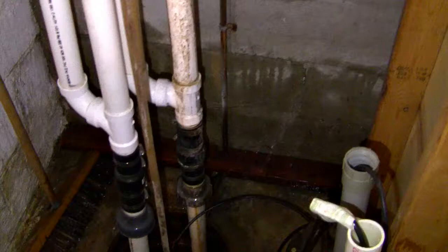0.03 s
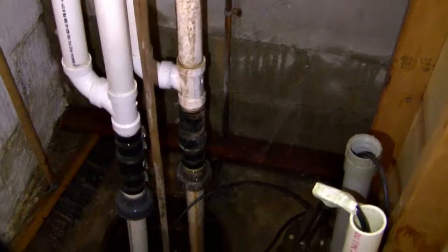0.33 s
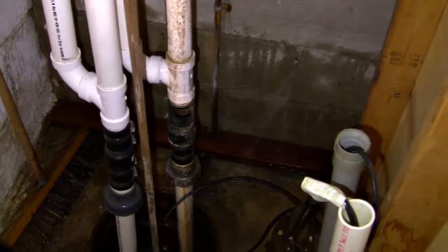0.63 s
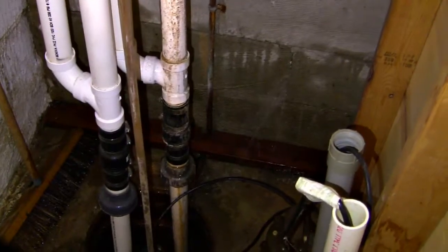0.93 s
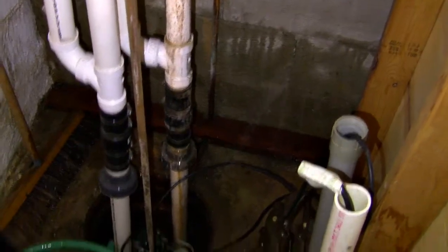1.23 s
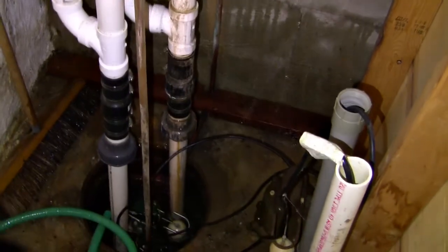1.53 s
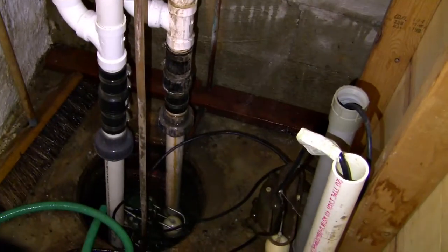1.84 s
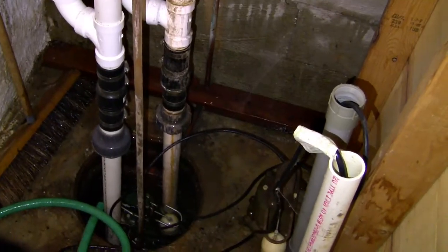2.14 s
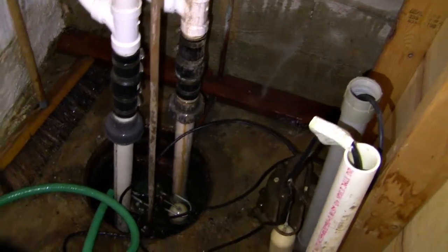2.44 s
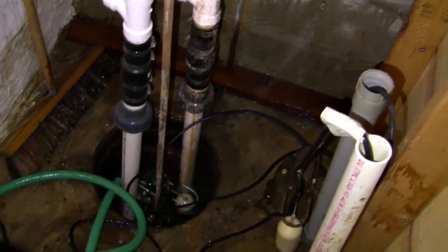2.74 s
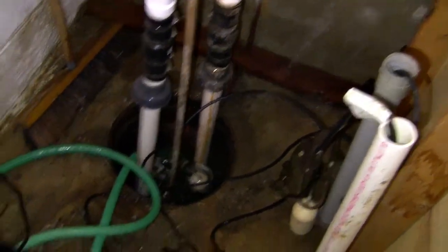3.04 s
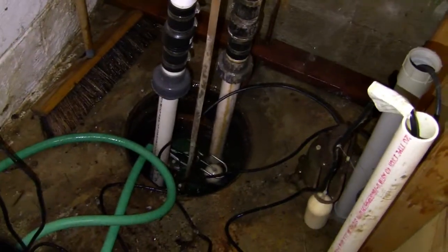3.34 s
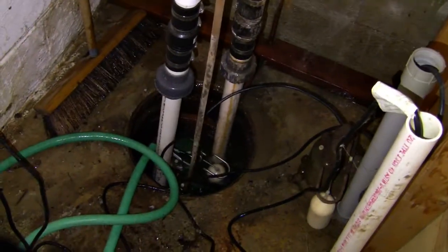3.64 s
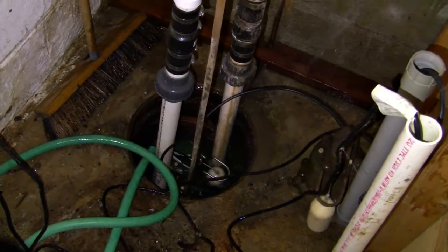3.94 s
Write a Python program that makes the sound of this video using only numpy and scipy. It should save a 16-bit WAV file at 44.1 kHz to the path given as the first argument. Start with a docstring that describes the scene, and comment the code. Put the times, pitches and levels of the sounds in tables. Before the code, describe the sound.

Water trickles and drips into a basement sump pit over a low pump hum.

```python
"""Trickle in a basement sump pit

Drops smack the water, ring small bubbles and echo in the pit and the room. Fine spatter, hiss and low
gurgling fill the gaps, over the hum and rush of a pump and a thin motor whine that fades.
Near the start a hand-held camera gives a few dull clicks."""
import sys
import numpy as np
from scipy import signal
from scipy.fft import rfft, irfft, next_fast_len
from scipy.io import wavfile
from scipy.ndimage import uniform_filter1d, map_coordinates

SR = 44100
rng = np.random.default_rng(int(sys.argv[2]) if len(sys.argv) > 2 else 0)


def output_pcm(signal):
    """Save a mono or channel-first signal as 16-bit PCM at the path in sys.argv[1].

    Samples are clipped to [-1, 1] before scaling.
    """
    pcm = np.clip(np.atleast_2d(signal).T, -1, 1) * 32767
    wavfile.write(sys.argv[1], SR, np.round(pcm).astype(np.int16))


N = 176400
T = np.arange(N) / SR
AGE = np.arange(SR // 4) / SR  # seconds since a drop or click struck


def amp(db):
    """Decibels to gain."""
    return 10 ** (np.asarray(db) / 20)


def unit(x):
    """Scale to rms 1."""
    return x / np.sqrt(np.mean(x ** 2) + 1e-20)


def fade(t60):
    """An exponential decay, 60 dB down after t60 seconds."""
    return np.exp(-np.log(1000) * AGE / t60)


def wobble(rate):
    """A smooth random curve, rate knots a second."""
    return map_coordinates(rng.standard_normal(400), [T * rate], mode="wrap")


def coloured(x, points):
    """Equalise x through (f/Hz, gain/dB) points on a log frequency axis."""
    f, db = np.transpose(points)
    hz = np.fft.rfftfreq(len(x), 1 / SR)
    return irfft(rfft(x) * amp(np.interp(np.log(hz + 1), np.log(f), db)), len(x))


def above(x, hz):
    """A gentle low cut at hz."""
    return signal.sosfilt(signal.butter(2, min(hz, SR / 3), "high", fs=SR, output="sos"), x)


def add(track, s, sound):
    """Mix a sound in at s seconds."""
    part = track[max(0, round(s * SR)):][:len(sound)]
    part += sound[:len(part)]


def tone(hz, drift_rad):
    """A sine of rms 1 with a wandering phase."""
    return np.sqrt(2) * np.sin(2 * np.pi * (hz * T + rng.random()) + drift_rad * wobble(4.06))


def rush(spectrum, patchy_db):
    """A coloured noise bed of rms 1 that flickers in small patches of time and frequency."""
    bins = signal.stft(rng.standard_normal(N), nperseg=512)[2]
    patches = uniform_filter1d(uniform_filter1d(rng.standard_normal(bins.shape), 5, 0), 8, 1)
    noise = signal.istft(bins * amp(patchy_db * unit(patches)), nperseg=512)[1][:N]
    return unit(coloured(noise, spectrum))


def pump():
    """Wavering hum over a steady rush, while the slipping motor beats against the mains buzz."""
    # pump and mains hum lines: f/Hz, level/dB, waver/dB
    hum_lines = [(59.7, -55, 1.5), (143.7, -34, 1.2), (214.7, -47, -1.5), (239, -43.5, 2),
                 (354.7, -44, -1.5), (829, -48.5, -6)]
    # spectrum of the pump's rush: f/Hz, relative level/dB
    rush_spectrum = [(20, -25), (40, -11), (62, -6.5), (85, -8.5), (115, 1), (200, -0.5), (300, 2),
                     (400, -2.5), (520, 2.5), (650, -1), (790, 2), (875, 5.5), (960, -1.5), (1050, -1),
                     (1400, -5.5), (1900, -7), (2600, -15), (4000, -21.5), (8000, -32)]
    mains_hz, beat_hz, beat_dip_s = 120, 1.9, 1.03
    swell_db_per_s = 1
    hum = sum(amp(db + waver * wobble(5.96)) * tone(hz, drift_rad=0.37) for hz, db, waver in hum_lines)
    turn = 2 * np.pi * (T - beat_dip_s)
    buzz = amp(-42) * np.sin(mains_hz * turn) - amp(-46.5) * np.sin((mains_hz - beat_hz) * turn)
    buzz = np.sqrt(2) * buzz * amp(swell_db_per_s * T + 2.2 * wobble(8))
    return hum + buzz + amp(-29.5) * rush(rush_spectrum, patchy_db=1.5)


def whine():
    """A thin motor tone fades between steady sidebands that make it flutter."""
    # fader curve of the centre tone: t/s, level/dB
    fader = [(.13, -29.5), (.6, -29.5), (1.0, -28.5), (1.5, -32), (2.3, -32), (2.7, -33), (3.0, -38),
             (3.4, -37), (4, -52)]
    # sidebands two flutter steps below, one below and one above: level/dB
    sideband_db = [-47.5, -42.5, -53]
    whine_hz, flutter_hz = 1097, 45.8
    centre = amp(np.interp(T, *np.transpose(fader))) * tone(whine_hz, drift_rad=0.37)
    sidebands = sum(amp(db) * tone(whine_hz + step * flutter_hz, drift_rad=0.083)
                    for step, db in zip([-2, -1, 1], sideband_db))
    return centre + sidebands


def echoed(x, echo_db):
    """Add sharp slaps off the pit wall and a softer basement tail; rms 1 over the first 10 ms."""
    pit_t60, room_t60 = 0.043, 0.14
    pit_noise, room_noise = rng.standard_normal((2, len(AGE)))
    pit = signal.fftconvolve(x, pit_noise ** 3 * fade(pit_t60))[:len(AGE)]  # cubed: a few strong echoes
    room = signal.fftconvolve(x, room_noise * fade(room_t60) * (1 - fade(0.031)))[:len(AGE)]
    heard = unit(x) + amp(echo_db) * (amp(2) * unit(pit) + amp(-0.5) * unit(room))
    return heard / np.sqrt(np.mean(heard[:SR // 100] ** 2))


def drop(hz, cycles, splash_db, echo_db):
    """A drop cracks, splashes and rings two bubbles that bend upward, dying 60 dB in `cycles` periods."""
    # spectrum of the splash: f/bubble pitch, relative level/dB
    splash_spectrum = [(.3, -22), (.6, -2), (.9, 5), (1.4, -2), (2, -15.5), (3, -19), (5, -30)]
    pitch_rise, splash_t60, crack_t60 = 0.047, 0.016, 0.00054
    ring = fade(cycles / hz)
    phase = 2 * np.pi * np.cumsum(hz * (1 + pitch_rise * (.5 - ring))) / SR
    ratio = 1.412 * np.exp(.08 * rng.standard_normal())  # the smaller bubble rings higher
    bubbles = (np.sin(phase) + amp(-11.5) * np.sin(ratio * phase)) * ring * (1 - fade(2 / hz))
    crackle = rng.standard_normal(len(AGE)) * rng.exponential(size=len(AGE))
    splash = coloured(crackle, [(k * hz, db) for k, db in splash_spectrum])
    splash *= fade(splash_t60) + amp(12) * fade(crack_t60)
    direct = unit(above(bubbles, 0.53 * hz)) + amp(splash_db) * unit(above(splash, 0.6 * hz))
    return echoed(direct, echo_db)


def shower(per_s, hz, octaves, cycles, scatter_db, splash_db, echo_db):
    """Many small drops of random time and level, pitched up to `octaves` either side of hz."""
    out = np.zeros(N)
    palette = [drop(hz * 2 ** (octaves * u), cycles, splash_db, echo_db) for u in np.linspace(-1, 1, 30)]
    for when, pick, softness in rng.random((int(per_s * N / SR), 3)):
        add(out, when * N / SR, amp(-scatter_db * np.sqrt(softness)) * palette[int(pick * len(palette))])
    return out


def trickle():
    """Hiss, spatter and sharp ticks of spray ride the flow; bubbles gurgle evenly below."""
    # strength of the flow: t/s, gain/dB
    flow_curve = [(.13, 3), (.65, 5), (.85, 3), (1.02, 0), (1.3, 0.5), (1.45, 3.5), (1.65, -2), (1.85, 4),
                  (2.15, 1), (2.33, 5), (2.6, 2), (2.7, 5.5), (2.95, 2), (3.18, 6), (3.26, -3), (3.48, 9),
                  (3.7, -2.5), (3.85, -1.5)]
    # spectrum of the water's hiss: f/Hz, relative level/dB
    hiss_spectrum = [(1500, -26), (3000, 22.5), (5000, -4), (7000, 6.5), (10000, 9.5), (13000, 2),
                     (16000, -37)]
    flow = amp(np.interp(T, *np.transpose(flow_curve)))
    hiss = amp(-52.5 + 0.51 * wobble(16)) * rush(hiss_spectrum, patchy_db=1.5)
    spatter = shower(per_s=70, hz=5600, octaves=0.62, cycles=11, scatter_db=20.5, splash_db=-8, echo_db=4)
    spray = shower(per_s=49, hz=9430, octaves=0.41, cycles=11,
                   scatter_db=19.5, splash_db=-9, echo_db=-1.5)
    gurgle = shower(per_s=40, hz=1116, octaves=1.175, cycles=27,
                    scatter_db=3, splash_db=-32, echo_db=11)
    return flow * (hiss + amp(-38) * spatter + amp(-38.5) * spray) + amp(-37) * gurgle


def drips():
    """Bright foreground drops, and rounder plops from larger bubbles that ring longer."""
    # clear drops: t/s, relative level/dB, bubble f/Hz, splash against bubble/dB
    drops = [(.209, -23, 7340, -6), (.223, -16.5, 3300, -18), (0.224, -17.5, 9700, -2),
             (.2756, -20.5, 4350, 5), (0.368, -25.5, 7460, 3), (.4908, -22, 5300, 7),
             (.559, -8.5, 4400, -5), (.621, -19.5, 5200, -6), (.7444, -28, 9700, -4),
             (0.768, -26, 7450, -6), (0.918, -28, 10000, -4), (1.019, -31, 10200, 1),
             (1.0818, -24, 5750, -17), (1.153, -24, 5500, -3.5), (1.1706, -22, 3040, -17),
             (1.361, -27, 7800, 0), (1.4177, -12.5, 3220, 1), (1.4347, -24, 8300, -5.5),
             (1.5079, -19, 4220, -15.5), (1.71, -22, 4800, 2), (1.7735, -21.5, 7000, -5),
             (1.7886, -28, 8640, -7), (1.841, -23, 5650, -2), (1.894, -23.5, 4600, -8),
             (1.9772, -14, 4040, -8), (2.2762, -11, 3360, -7), (2.3114, -24, 7150, -7),
             (2.3277, -18, 6640, 0), (2.398, -24, 8000, 7), (2.415, -14, 10000, 1), (2.5508, -12, 2920, -1),
             (2.6244, -17, 4960, 3), (2.671, -25.5, 5800, 3), (2.7026, -23.5, 9600, -5),
             (2.7655, -11.5, 3230, -2.5), (2.792, -26.5, 11000, 2), (2.82, -18, 6900, 1),
             (2.861, -19, 5250, 1), (2.8767, -21, 8400, 2), (2.9199, -16, 5260, -7), (2.943, -21, 11700, 0),
             (3.0203, -19.5, 5400, 1), (3.1012, -14.5, 3850, -3), (3.1383, -24.5, 5900, 2),
             (3.188, -24, 11000, 2), (3.4487, -16.5, 5040, 0), (3.469, -29, 6430, -4),
             (3.604, -26.5, 13000, 2), (3.736, -27.5, 4510, 3), (3.7645, -25.5, 4540, 8),
             (3.7889, -11.5, 3430, 0), (3.878, -25.5, 9100, 1), (3.89, -24, 8350, 12),
             (3.9207, -24.5, 4460, -12), (3.9954, -20.5, 5700, -8)]
    # larger bubbles: t/s, relative level/dB, f/Hz
    plops = [(.72, -30.5, 1800), (1.143, -24, 1420), (1.387, -22, 1180), (1.604, -24.5, 1690),
             (1.809, -26, 929), (2.305, -25, 1540), (2.673, -21.5, 870), (2.711, -33, 1510),
             (3.803, -26.5, 1740)]
    out = np.zeros(N)
    for s, db, hz, splash_db in drops:
        add(out, s, amp(db - 11.5) * drop(hz, cycles=20.7, splash_db=splash_db, echo_db=2))
    for s, db, hz in plops:
        add(out, s, amp(db - 4) * drop(hz, cycles=51, splash_db=-16, echo_db=-6))
    return out


def handling_clicks():
    """Dry clicks ring the camera body; neighbouring modes swing in opposite directions."""
    # clicks: t/s, relative level/dB
    clicks = [(0.3181, 1), (0.3313, -4.5), (0.3348, -3), (0.3371, -7), (0.342, -12), (.347, -9),
              (0.44, -5.5)]
    # modes of the body: f/Hz, relative level/dB, t60/s
    body_modes = [(200, -15.5, 0.046), (726, -3, 0.018), (1220, -5.5, 0.01), (1567, -2, 0.0093),
                  (2600, -24, 0.0072)]
    out = np.zeros(N)
    ring = sum((-1) ** k * amp(db) * np.cos(2 * np.pi * hz * AGE) * fade(t60)
               for k, (hz, db, t60) in enumerate(body_modes))
    attack = 1 - fade(0.00064)
    for s, db in clicks:
        tick = amp(-23) * rng.standard_normal(len(AGE)) * fade(0.0088)
        add(out, s, amp(db) * (ring * attack + tick))
    return out


def limiter(x, ceiling_db, release_s):
    """Duck at once on a peak over the ceiling, then recover smoothly."""
    excess = np.log(np.maximum(abs(x) / amp(ceiling_db), 1))
    recovery = np.exp(-T / release_s)
    reduction = np.maximum.accumulate(excess / recovery, axis=-1) * recovery
    return x * np.exp(-reduction)


def scene():
    """The mono mix at the edge of the pit."""
    # colour that the pit gives the water: f/Hz, gain/dB
    pit_colour = [(1500, 0), (2500, -1.5), (3300, 0), (4600, 2), (5500, 1), (6500, -1), (9000, 0),
                  (13000, -.5), (16000, -6)]
    water = np.pad(drips() + trickle(), (0, SR // 10))
    water = coloured(water, pit_colour)[:N]
    return (pump() + whine() + handling_clicks() + water)[None]


def record(dry):
    """Limit the peaks, open quickly after a moment of silence and cut the very top."""
    start_s, fade_in_s, top_hz = 0.1207, 0.005, 15800
    opened = limiter(dry, ceiling_db=-3, release_s=0.075) * np.clip((T - start_s) / fade_in_s, 0, 1)
    size = next_fast_len(N + SR // 4)
    passband = np.fft.rfftfreq(size, 1 / SR) < top_hz
    return irfft(rfft(opened, size) * passband, size)[:, :N]


dry = scene()
out = record(dry)
output_pcm(out)
```